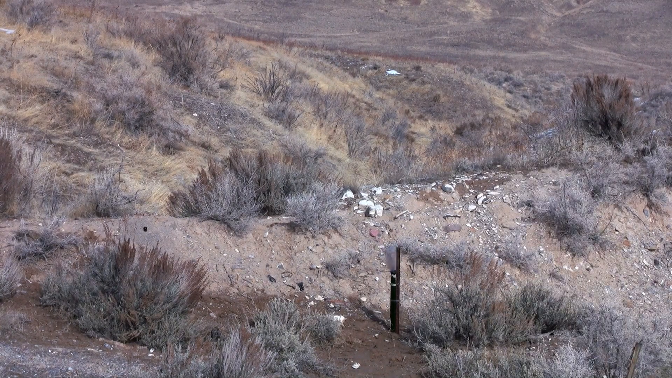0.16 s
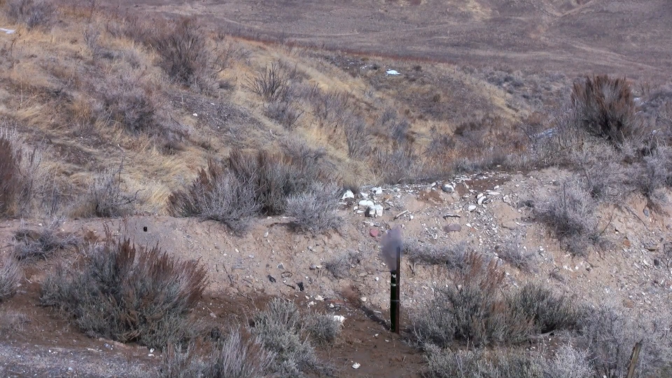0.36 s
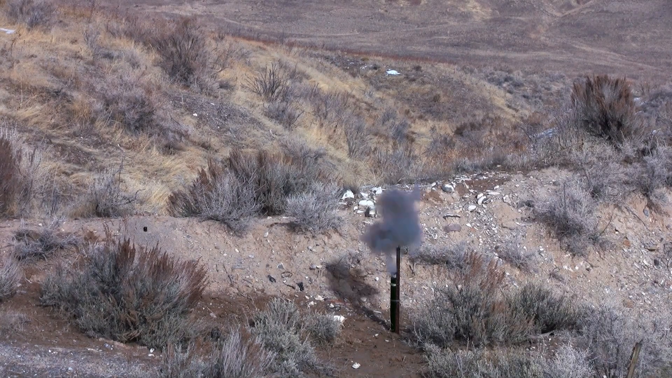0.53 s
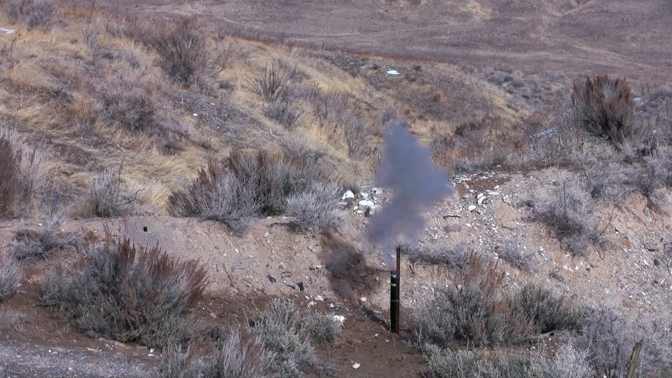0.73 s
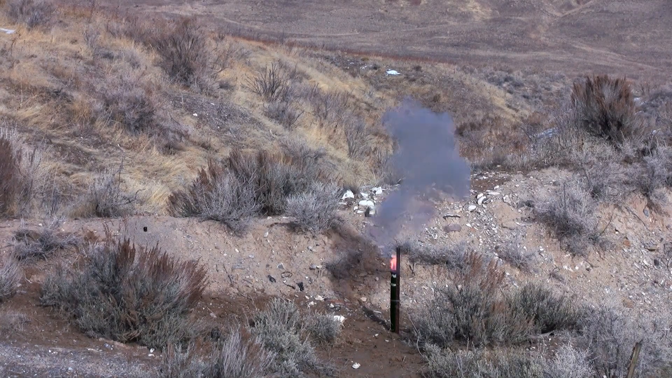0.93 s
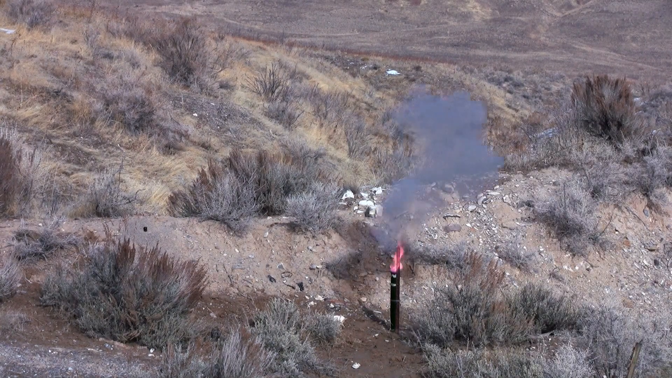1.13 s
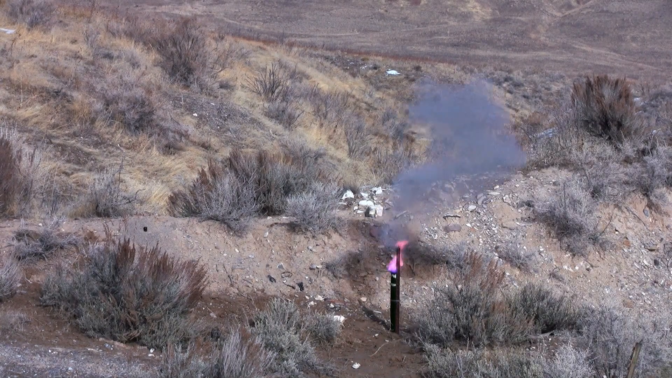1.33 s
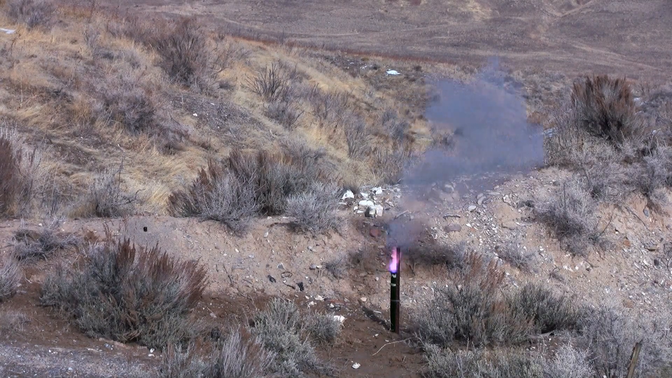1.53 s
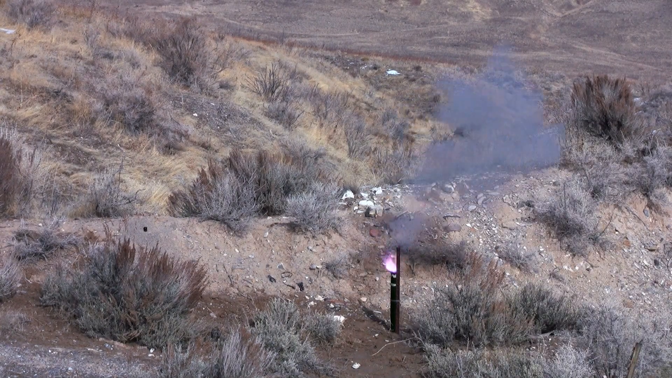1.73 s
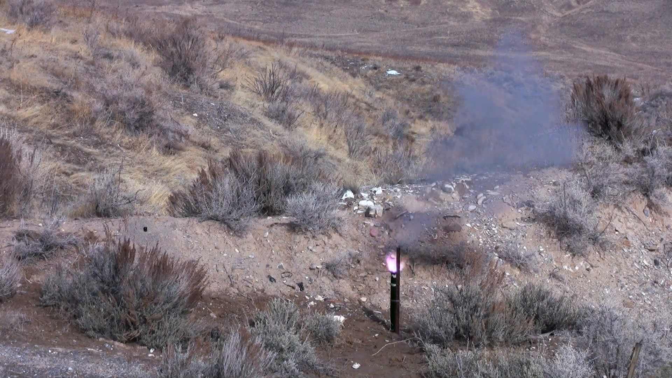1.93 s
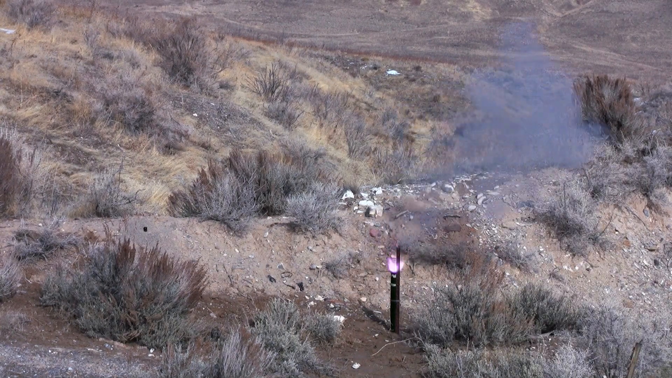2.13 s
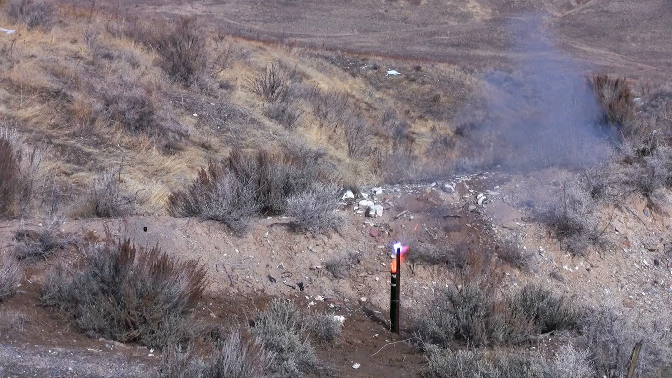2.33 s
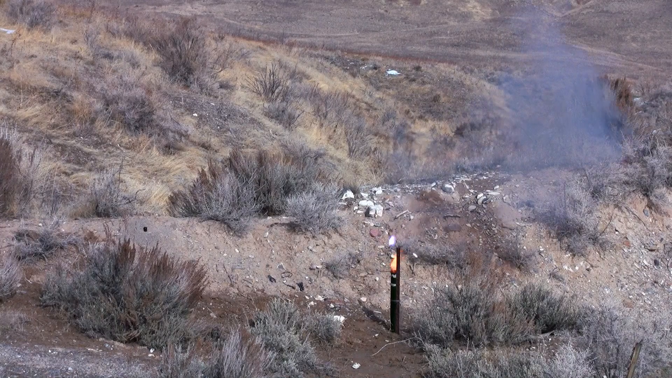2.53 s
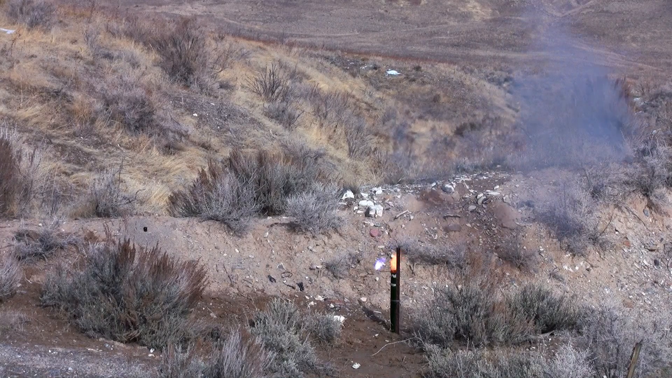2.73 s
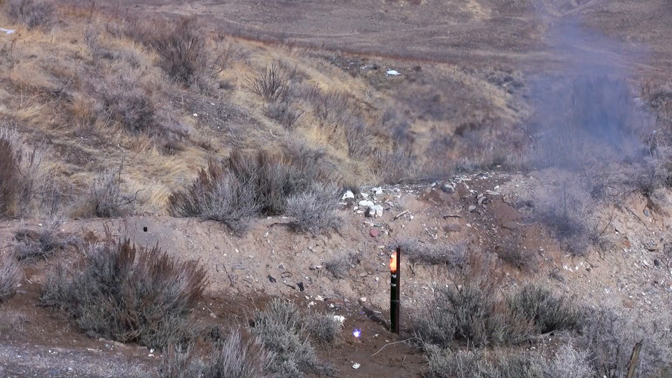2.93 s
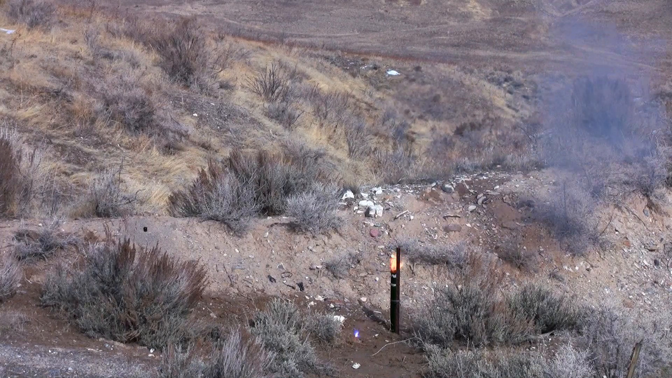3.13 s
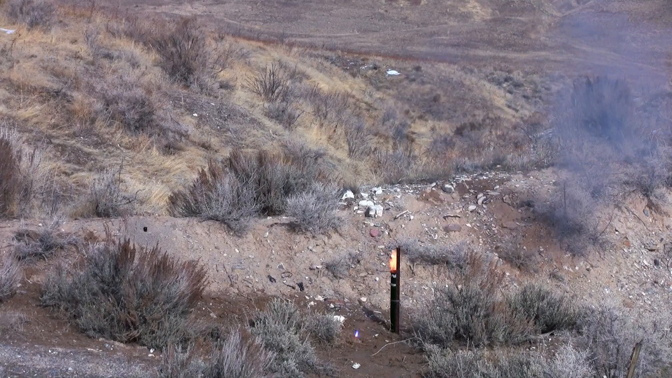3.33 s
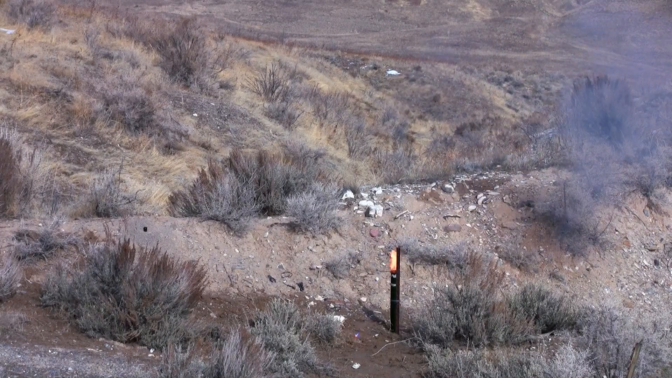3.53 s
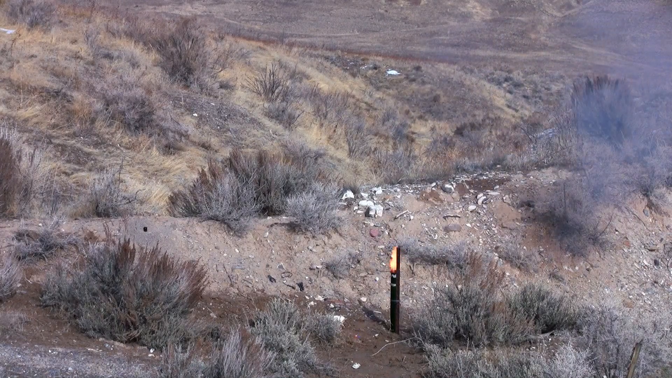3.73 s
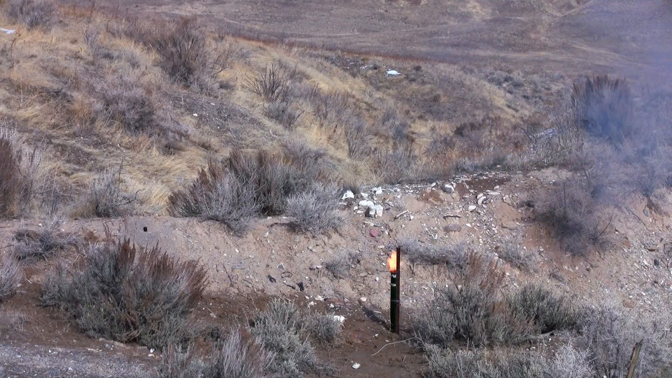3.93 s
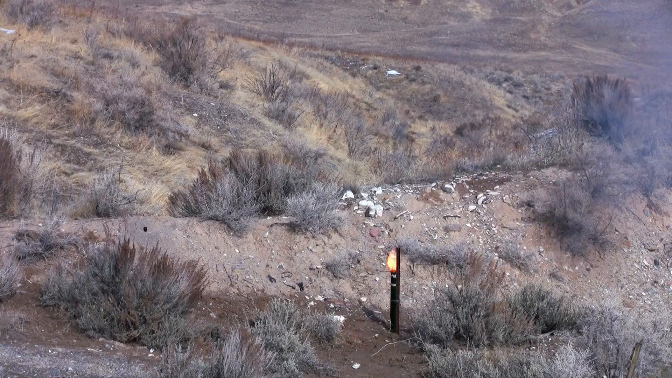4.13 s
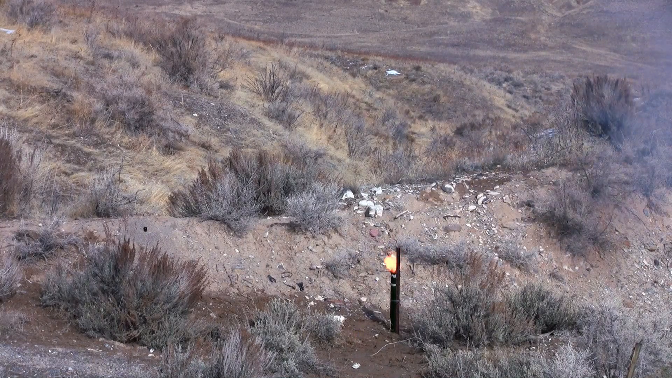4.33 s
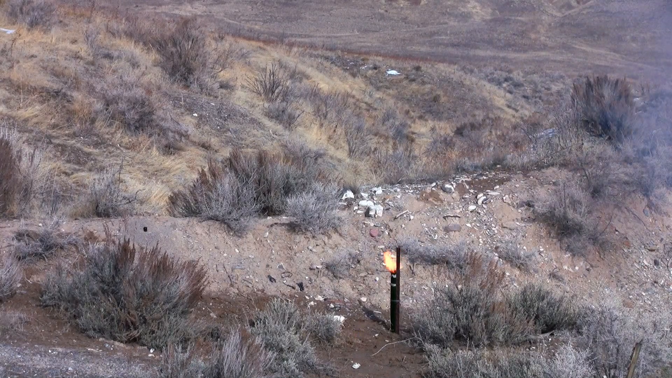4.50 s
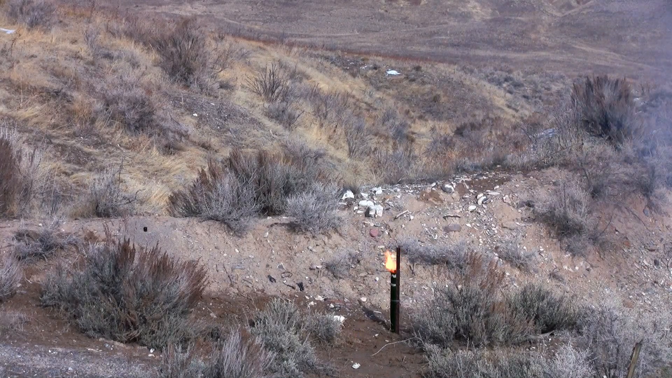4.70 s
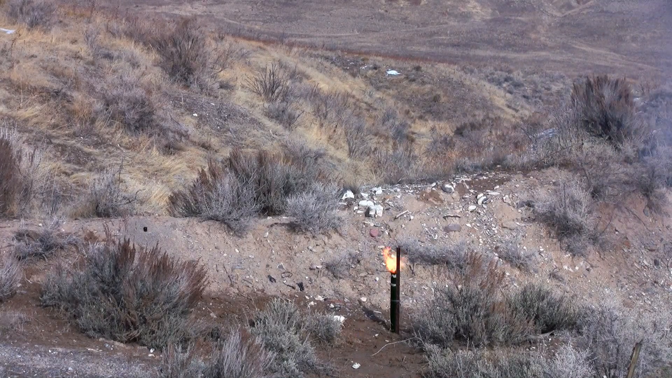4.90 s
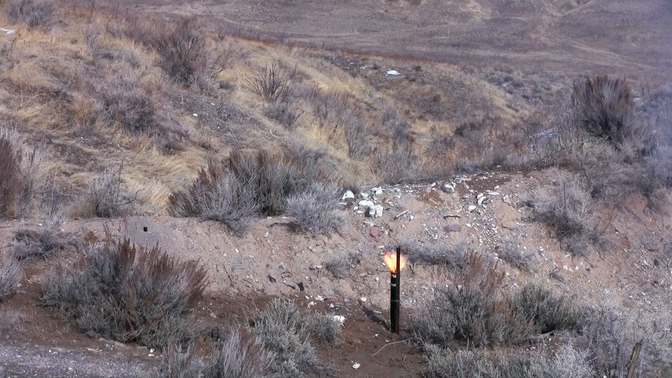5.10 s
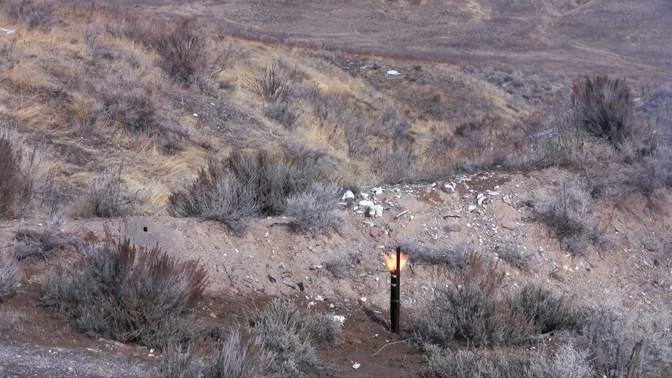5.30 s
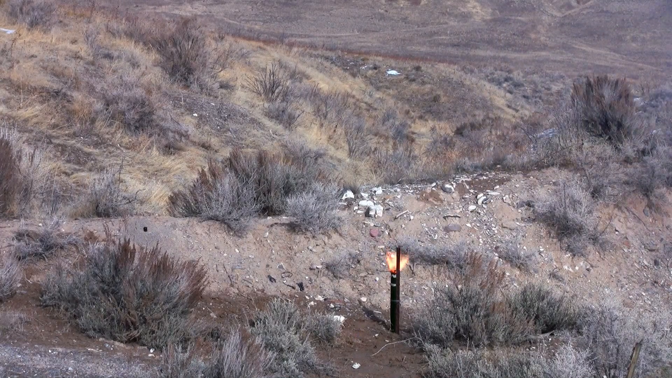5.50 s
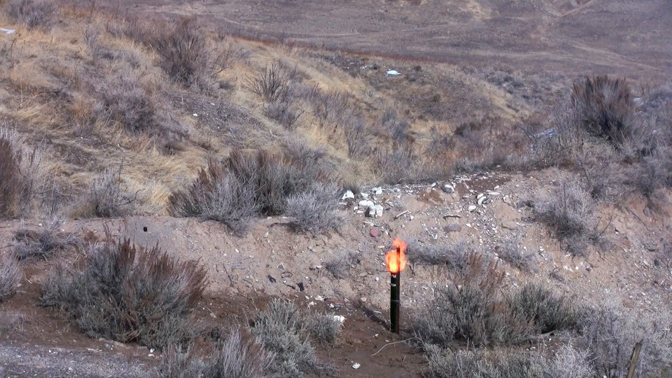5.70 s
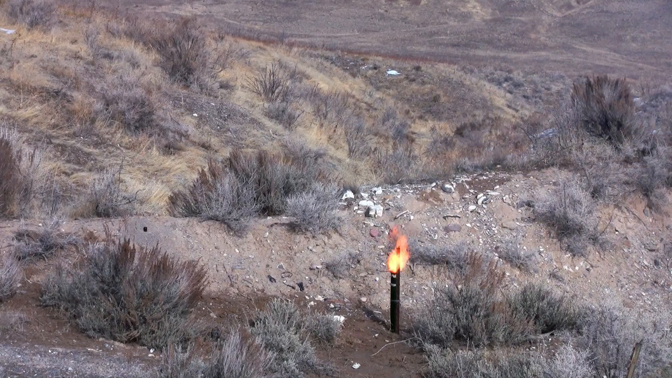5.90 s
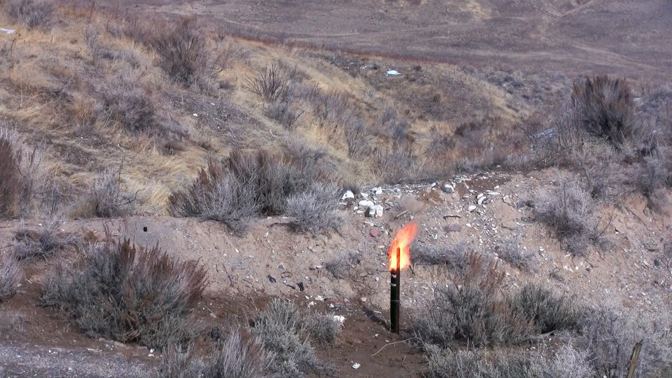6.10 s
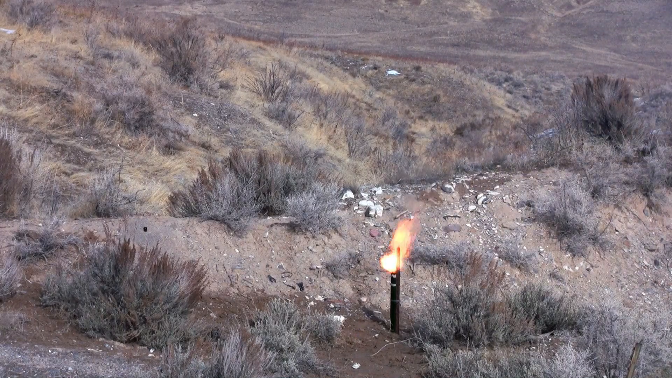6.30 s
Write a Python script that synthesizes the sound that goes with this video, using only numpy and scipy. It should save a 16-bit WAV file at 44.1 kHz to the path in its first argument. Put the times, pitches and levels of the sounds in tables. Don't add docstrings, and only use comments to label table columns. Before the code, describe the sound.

Heard from a few metres away outdoors, with light wind buffeting and faint microphone hiss: a clean gas jet swells under a second and explodes in a crisp double-edged bang, followed by short smeared echoes. A pause, then a rough, fluttering burn that cuts off with a smaller hollow crack. Tiny ember ticks over low burning, then a long rumbling swell turns into a bright, forceful hiss that keeps growing until the end.

```python
import sys
import numpy as np
from scipy import signal
from scipy.fft import rfft, irfft, next_fast_len
from scipy.io import wavfile
from scipy.ndimage import uniform_filter1d

SR = 44100
rng = np.random.default_rng(int(sys.argv[2]) if len(sys.argv) > 2 else 0)


def ratio_of_db(decibels):
    return 10 ** (np.asarray(decibels, float) / 20)


def unload_wav(signal):
    wavfile.write(
        sys.argv[1],
        SR,
        np.round(np.clip(np.atleast_2d(signal).T, -1, 1) * 32767).astype(np.int16),
    )


N = 280146
T = np.arange(N) / SR


def evened(x):
    return x / np.sqrt(np.mean(x ** 2) + 1e-20)


def read(points, hz):
    f, value = np.transpose(points)
    return np.interp(np.log(hz + 1), np.log(f + 1), value, left=-90, right=-90)


def colour(x, gain):
    size = next_fast_len(x.shape[-1])
    spectrum = rfft(x, size) * gain(np.fft.rfftfreq(size, 1 / SR))
    return irfft(spectrum, size)[..., :x.shape[-1]]


def wander(count, ms):
    size = max(round(ms * SR / 1000), 2)
    return evened(uniform_filter1d(uniform_filter1d(rng.standard_normal(count), size), size))


def bell(s, ms):
    return np.exp(-((T - s) * 1000 / ms) ** 2)


def burst(t, s, rise_ms, fall_ms):
    ms = (t - s) * 1000
    rise = np.exp(np.minimum(-ms / rise_ms, 50))
    fall = np.exp(np.minimum(ms / fall_ms, 50))
    return 2 / (rise + fall)


def turbulence(count, patchy_db, broad_db):
    a, b, fine, broad = rng.standard_normal((count // 64 + 5, 129, 4)).T
    fine = evened(uniform_filter1d(uniform_filter1d(fine, size=3, axis=0), size=24, axis=1))
    broad = evened(uniform_filter1d(uniform_filter1d(broad, size=8, axis=0), size=70, axis=1))
    cells = (a + 1j * b) * ratio_of_db(patchy_db * fine + broad_db * broad)
    return signal.istft(cells, nperseg=256, noverlap=192)[1][:count]


def puffs(rows, spectrum):
    out = np.zeros(N)
    for s, db, rise_ms, fall_ms, tilt_db in rows:
        near = slice(round((s - .03) * SR), round((s + .06) * SR))
        gas = rng.standard_normal(near.stop - near.start)
        gas = colour(gas, lambda hz: ratio_of_db(read(spectrum, hz) + tilt_db * np.log2(hz / 2000 + 0.012)))
        shape = burst(T[near], s, rise_ms, fall_ms)
        puff = shape * gas
        out[near] += ratio_of_db(db) * puff / np.sqrt(np.sum(puff ** 2) / np.sum(shape ** 2))
    return out


def rings(rows):
    return sum(ratio_of_db(db) * bell(s, ms) * np.cos(2 * np.pi * hz * (T - s)) for s, db, hz, ms in rows)


def bounced(hz, dip_hz, spacing_hz, strength, fade_hz):
    turn = 2j * np.pi * (hz - dip_hz) / spacing_hz
    return abs(1 - strength * np.exp(turn - hz / fade_hz))


# (frequency [Hz], density [dB per Hz])
VALLEY_HUSH = [(18, -32.5), (30, 0.5), (158, -7.5), (257, -3), (372, 2), (538, -1.5), (1560, -11.5),
               (1760, -10.5), (4000, -25), (5200, -44.5), (8800, -120)]
# (frequency [Hz], density [dB per Hz])
INPUT_HISS = [(1500, -10), (3500, 4.5), (6000, 3), (9000, -2.5), (12000, -6.5), (14000, -9.5), (15600, -12)]
# (time [s], gain [dB])
HISS_GAIN = [(0, 3), (.6, 5.5), (.66, 0), (1.1, -3.5), (1.6, 3), (2.4, 1), (3.2, -0.5), (4.5, 3),
             (6.35, 4.5)]


def air():
    hush = evened(colour(rng.standard_normal((2, N)), lambda hz: ratio_of_db(read(VALLEY_HUSH, hz))))
    hiss = evened(colour(rng.standard_normal((2, N)), lambda hz: ratio_of_db(read(INPUT_HISS, hz))))
    hush_db = -59 - 5.9 * bell(.88, ms=140)
    hiss_db = -76 + np.interp(T, *np.transpose(HISS_GAIN))
    return ratio_of_db(hush_db) * hush + ratio_of_db(hiss_db) * hiss


# (frequency [Hz], density [dB per Hz])
WIND_COLOUR = [(18, -39.5), (40, -7.5), (110, 3), (199, -0.5), (341, -8), (467, -16.5), (600, -17.5),
               (780, -41), (1320, -120)]
# (time [s], level [dB], rise [ms], fall [ms])
WIND_PUFFS = [(.04, -51, 56, 62), (.23, -48.5, 20, 22), (.28, -56, 12, 12), (.36, -45.5, 18, 30),
              (.41, -48, 7.7, 16), (.465, -38, 8.7, 18), (.57, -50, 27, 32), (.655, -44, 13, 9.2),
              (.73, -61, 30, 42), (0.789, -45, 4, 10), (.84, -53, 14, 27), (0.904, -56, 9.4, 24),
              (1.031, -56, 28, 13), (1.22, -64.5, 20, 62), (1.36, -64.5, 18, 33), (1.5, -59.5, 33, 49),
              (1.6, -57, 33, 58), (1.8, -64, 58, 36), (6.2, -55, 8, 19), (6.28, -50, 9, 19)]


def wind():
    lumps = rng.standard_normal((2, N)) * ratio_of_db(2.8 * wander(N, 3.2))
    gust = colour(lumps + 0.55 * lumps[::-1], lambda hz: ratio_of_db(read(WIND_COLOUR, hz)))
    swell = sum(ratio_of_db(db) * burst(T, s, rise_ms, fall_ms) for s, db, rise_ms, fall_ms in WIND_PUFFS)
    return evened(gust) * swell


# (start [s], level [dB], t60 [s], top [Hz], left-right likeness [0-1])
TAILS = [
    (.004, -24.5, 0.14, 10850, .9),
    (0.048, -51, .6, 3535, .3),
]
# (delay [s], smear [ms], level [dB], centre [Hz], width [octaves])
SLOPE_ECHOES = [
    (.095, 28, -37.5, 3296, 4.6),
    (.16, 33, -43, 4500, 1.4),
    (.29, 75, -52, 4500, 0.89),
    (.345, 22, -47.5, 1700, 1.3),
    (.41, 45, -53.5, 2242, .6),
]


def hillside(x):
    t = T[:SR // 2 + SR // 10]
    taps = np.zeros((2, len(t)))
    for s, db, t60, top_hz, same in TAILS:
        left, other = rng.standard_normal(taps.shape)
        right = same * left + np.sqrt(1 - same ** 2) * other
        tail = np.array([left, right]) * (t > s) * ratio_of_db(-60 * t / t60)
        tail = colour(tail, lambda hz: hz / (hz + 400) / (1 + (hz / top_hz) ** 2))
        taps += ratio_of_db(db) * tail / np.linalg.norm(tail[0])
    for s, ms, db, hz0, octaves in SLOPE_ECHOES:
        echo = rng.standard_normal(taps.shape) * bell(s, ms)[:len(t)]
        echo = echo + .3 * echo[::-1]
        echo = colour(echo, lambda hz: np.exp(-(np.log2(hz / hz0 + .01) / octaves) ** 2))
        taps += ratio_of_db(db) * echo / np.linalg.norm(echo[0])
    return signal.fftconvolve(x[None], taps, axes=1)[:, :N]


# (centre [Hz], width [Hz], gain [dB])
BODY_MODES = [
    (5500, 340, 1),
    (7600, 320, 4.5),
    (8100, 220, -3.5),
    (9200, 150, 1),
    (6260, 200, 1),
]


def camera_body(x):
    lift_db = lambda hz: sum(db / (1 + ((hz - hz0) / width) ** 2) for hz0, width, db in BODY_MODES)
    return colour(x, lambda hz: ratio_of_db(lift_db(hz)))


# (frequency [Hz], level [dB])
PORT_SHADE = [(5500, -47), (7600, -26.5), (8800, -15.5), (10300, -10), (11800, -8.5), (13000, -23.5)]


def ports(direct):
    turn = lambda hz: 1.2 * np.tanh((hz - 10600) / 250)
    shade = colour(direct, lambda hz: ratio_of_db(read(PORT_SHADE, hz)) * np.exp(-1j * turn(hz)))
    return np.array([direct - shade, direct + shade])


# (time [s], level [dB], length [ms], tilt [dB per octave])
EMBER_SPITS = [(2.6722, -53.5, 2.6, 2), (2.71, -52.5, 5, -2.5), (2.768, -55, 1.8, -1.5),
               (2.797, -53, 1.7, -1.5), (2.828, -62, 1.6, 1), (2.980, -50.5, 1.18, -2),
               (2.987, -52.5, 2.5, -2), (3.040, -54, .9, -0.7), (3.076, -45.5, 2.4, -4.5),
               (3.608, -58, 1.22, -9), (4.577, -48, 1.1, -9), (2.921, -56.5, 1.3, -2.5)]
# (frequency [Hz], density [dB per Hz])
SPIT_COLOUR = [(150, 18), (4000, 1.5), (9500, -13.5), (12000, -18.5), (15500, -50.5)]
# (time [s], level [dB], frequency [Hz], half length [ms])
EMBER_KNOCKS = [
    (3.079, -47, 620, 2.2),
    (2.99, -48, 300, 3.5),
    (2.796, -50, 600, 2),
]


def embers():
    rows = [(s + .001, db, .4 * ms, ms, tilt_db) for s, db, ms, tilt_db in EMBER_SPITS]
    return puffs(rows, SPIT_COLOUR) + rings(EMBER_KNOCKS)


def whistle():
    centre_hz, half_width_hz = 1650, 70
    ridge = lambda hz: 1 / (1 + ((hz - centre_hz) / half_width_hz) ** 2)
    return ratio_of_db(-54.5) * bell(1.34, ms=150) * evened(colour(rng.standard_normal(N), ridge))


# (time [s], level [dB], centre [Hz], half length [ms])
GAS_TONGUES = [(.33, -61, 7200, 55), (.59, -46.5, 11700, 12), (0.59, -35, 3500, 8), (1.48, -43, 2210, 7.3),
               (1.73, -39.5, 2140, 46), (1.56, -61, 3700, 45), (1.64, -46.5, 4470, 42),
               (1.65, -59.5, 7450, 30), (1.92, -40, 2720, 64), (1.93, -53, 7640, 21), (2.03, -50, 4930, 22),
               (2.05, -46, 2020, 25), (2.14, -53, 4860, 51), (2.15, -53.5, 7000, 14),
               (2.189, -35, 1036, 6.2), (4.5, -86, 7670, 130), (4.85, -82, 5900, 150), (5.2, -47, 3600, 53),
               (5.88, -40.5, 4480, 64), (5.984, -37.5, 3000, 5.6), (6.011, -35, 3550, 15),
               (6.03, -40.5, 4950, 44), (6.225, -40, 2500, 13), (6.09, -46, 7600, 16),
               (6.12, -32.5, 3000, 14), (6.145, -41, 9200, 38), (6.165, -29.5, 2170, 4.7),
               (6.3, -33.5, 2150, 43), (6.325, -28, 2780, 11), (6.3, -35, 9200, 59),
               (6.31, -28.5, 3460, 62)]


def flares():
    out = np.zeros(N)
    for s, db, hz0, ms in GAS_TONGUES:
        octaves = .1 + 1500 / hz0 * .9
        band = lambda hz: np.exp(-(np.log2(hz / hz0 + .01) / octaves) ** 2)
        gas = evened(colour(rng.standard_normal(8192), band))
        out += ratio_of_db(db) * bell(s, ms) * np.resize(gas, N)
    return colour(out, lambda hz: bounced(hz, dip_hz=2550, spacing_hz=1830, strength=.65, fade_hz=16000))


# (time [s], level [dB], frequency [Hz], half length [ms])
TUBE_POPS = [
    (2.3548, -27, 235, 5.5),
    (.638, -37, 260, 10),
    (4.6155, -35, 190, 4),
    (5.735, -26, 230, 6),
]


def tube_pops():
    return rings(TUBE_POPS)


# (time [s], peak level [dB], rise [ms], fall [ms], tilt [dB per octave])
GAS_BLASTS = [
    (.6258, -6, 1.54, 2.1, 3.5),
    (.6305, -7.5, 0.96, 1.75, -2),
    (.6400, -6, 1, 1.14, 3.5),
    (.6443, -10.5, 1.8, 2.1, 7.5),
    (.620, -20, 4.6, 4.3, 4.5),
    (2.346, -37, 4, 6, 4),
    (2.348, -25.5, 2, 3.4, -9.5),
    (2.358, -52, 3.2, 21.3, 6),
]
# (frequency [Hz], density [dB per Hz])
BLAST_COLOUR = [(59, -62), (100, -28.5), (233, -17), (429, -13), (742, -12), (956, -5.5), (1430, 0),
                (1620, 0.5), (2420, -6.5), (4020, -13.5), (5510, -23), (6390, -25.5), (7410, -24),
                (9340, -27), (15500, -56.5)]


def blasts():
    return colour(puffs(GAS_BLASTS, BLAST_COLOUR), lambda hz: 1 / (1 + (hz / 12310) ** 8))


# (frequency [Hz], density [dB per Hz])
ROAR_COLOUR = [(250, -12), (450, -3), (700, -3), (1000, -9), (1400, -13.5), (2500, -49.5)]
# (frequency [Hz], density [dB per Hz])
TUBE_RUMBLE = [(41, -49), (70, -16), (119, -7), (236, 1), (339, -5.5), (381, -7.5), (490, -21.5),
               (520, -18), (680, -40), (1140, -120)]


def surge(rows, jet, bounce, mix, flutter_db):
    s, *levels = np.transpose(rows)
    near = slice(max(round((s[0] - .01) * SR), 0), min(round((s[-1] + .01) * SR), N))
    t = T[near]
    hiss_db, flame_db = (np.interp(t, s, v) for v in levels)
    sizzle_mid_db, per_jet, per_flame, roar_share_db, rumble_share_db = mix
    middle_db = -40
    sizzle_db = sizzle_mid_db + per_jet * (hiss_db - middle_db) + per_flame * (flame_db - middle_db)
    roar_db = roar_share_db + flame_db + 0.17 * (hiss_db - flame_db)
    rumble_db = flame_db + rumble_share_db

    heard = lambda hz: ratio_of_db(read(jet, hz)) * bounced(hz, *bounce)
    low = lambda hz: 1 / np.sqrt(1 + (hz / 3310) ** 6)
    high = lambda hz: np.sqrt(1 - low(hz) ** 2)
    slow, fast = wander(len(t), 9), wander(len(t), 1.5)
    gas = turbulence(len(t), patchy_db=1.6, broad_db=1.5)
    hiss = gas * ratio_of_db(0.303 * flutter_db * slow + 0.27 * fast)
    hiss = evened(colour(hiss, lambda hz: heard(hz) * low(hz)))
    sizzle = gas * ratio_of_db(flutter_db * slow + 0.68 * fast)
    sizzle = evened(colour(sizzle, lambda hz: heard(hz) * high(hz)))
    roar = gas * ratio_of_db(0.27 * slow + .9 * fast)
    roar = evened(colour(roar, lambda hz: ratio_of_db(read(ROAR_COLOUR, hz))))
    rumble = rng.standard_normal(len(t)) * ratio_of_db(1.5 * slow)
    rumble = evened(colour(rumble, lambda hz: ratio_of_db(read(TUBE_RUMBLE, hz))))

    lit = 1. * (t >= s[0]) * (t <= s[-1])
    burning = np.sqrt(np.abs(uniform_filter1d(lit, size=300)))
    fire = ratio_of_db(hiss_db) * hiss + ratio_of_db(sizzle_db) * sizzle + ratio_of_db(roar_db) * roar + ratio_of_db(rumble_db) * rumble
    out = np.zeros(N)
    out[near] = burning * fire
    return out


# (time [s], jet strength [dB], flame size [dB])
CLEAN_JET = [(0, -66, -59.5), (.14, -52, -56), (.22, -46.5, -58.5), (.34, -37, -61.5), (.45, -32, -62),
             (.53, -29, -55.5), (.594, -23.5, -52.5), (.606, -29.5, -59), (.612, -28, -60.5)]
FLAME_LIGHTS = [(1.08, -71.5, -79), (1.31, -56, -75), (1.396, -49.5, -79), (1.42, -52, -48),
                (1.45, -45, -73), (1.472, -53, -35.5), (1.69, -46.5, -36)]
RAGGED_BURN = [(1.69, -50, -52), (1.722, -45, -42.5), (1.79, -42.5, -43.5), (1.864, -37.5, -36.5),
               (2.117, -39, -45), (2.148, -37.5, -40.5), (2.176, -41.5, -46), (2.32, -41, -36),
               (2.346, -31, -41.5)]
LONG_SWELL = [(4.15, -59.5, -51), (4.688, -48.5, -42.5), (4.76, -48.5, -38.5), (4.79, -48.5, -42),
              (5.04, -44.5, -41.5), (5.102, -41, -33), (5.134, -43, -38), (5.642, -36, -29),
              (5.751, -37.5, -30)]
JET_RETURNS = [(5.75, -34, -39), (5.78, -37.5, -49.5), (5.902, -36.5, -43), (6.01, -30.5, -46.5),
               (6.042, -32, -39), (6.121, -30, -52), (6.204, -31, -38), (6.316, -26.5, -40),
               (6.353, -25, -45.5)]
LOW_BURN = [(2.43, -74, -65.5), (2.506, -71.5, -64.5), (3.3, -71, -64), (3.388, -68, -61),
            (4.15, -59.5, -56)]
# (frequency [Hz], density [dB per Hz])
JET_COLOURS = [
    [(530, -36), (1100, -2), (2000, -2), (3900, -9), (5000, -20.5), (9400, -19), (10200, -33.5),
     (15500, -56)],
    [(530, -51.5), (900, 3), (1700, 1.5), (3700, -1.5), (4600, -11), (7400, -19), (15500, -62)],
    [(530, -20), (900, -3), (2000, -1), (3600, -8), (5400, -16), (6300, -20), (9300, -20), (15500, -59)],
    [(530, -38), (900, 5.5), (1400, -3.5), (3800, -9.5), (5000, -14), (9400, -20.5), (15500, -55)],
    [(530, -25.5), (1050, -5), (1800, -3.5), (3800, -7.5), (5000, -7.5), (9400, -9.5), (11000, -20),
     (14800, -33.5), (15500, -35)],
    [(530, -60), (900, -6), (1340, 13.5), (2200, 7.5), (3700, 4.5), (4800, -4), (9000, -24), (11700, -68)],
]
# (one dip [Hz], spacing [Hz], strength [0-1], rough ground loses it over [Hz])
GROUND_BOUNCES = [
    (2680, 1830, 0.3, 25000),
    (2618, 1790, 0.39, 20000),
    (2570, 1700, 0.18, 6700),
    (2996, 2016, 0.85, 4400),
    (2770, 1780, .36, 11000),
    (3000, 1580, 0.3, 15000),
]
# (sizzle at middle strength [dB], its rise with jet [dB/dB], with flame [dB/dB],
# roar above flame size [dB], rumble above flame size [dB])
STAGE_MIXES = [
    (-57, 1.615, .05, 1, -0.5),
    (-37, 1.36, 0.94, -21, -19),
    (-49, 0.83, 0.086, -2, 2),
    (-48.5, 1.82, 0.044, -8, -2.4),
    (-53.5, 1.5, 0.17, -9, 2),
    (-62, 1.21, 0.055, 0.3, 2),
]
EDGE_FLUTTER = [1.1, 1.3, 2.2, 2.4, 1.5, 1.5]
# (time [s], depth [dB], half width [ms])
BRIEF_DIPS = [(.605, 6, 6), (1.69, 9, 4), (1.785, 7, 5), (2.005, 4, 16), (6.0, 4, 4), (6.19, 2.5, 12),
              (5.96, 2, 10), (2.1, 2.5, 10), (2.21, 2.5, 12), (2.331, 5, 6), (6.065, 2, 20), (1.84, 2, 20),
              (6.052, 3, 3), (6.08, 2.5, 8)]


def surges():
    stages = [CLEAN_JET, FLAME_LIGHTS, RAGGED_BURN, LONG_SWELL, JET_RETURNS, LOW_BURN]
    fire = sum(map(surge, stages, JET_COLOURS, GROUND_BOUNCES, STAGE_MIXES, EDGE_FLUTTER))
    return fire * ratio_of_db(-sum(db * bell(s, ms) for s, db, ms in BRIEF_DIPS))


def motor():
    return surges() + whistle() + flares() + blasts() + tube_pops() + embers()


def scene():
    direct = camera_body(motor())
    return ports(direct) + hillside(direct) + wind() + air()


# (level [dB], ceiling [Hz])
TREBLE_CEILING = [
    (-48, 15900),
    (-41, 15000),
    (-33, 14200),
    (-28, 14800),
    (-20, 15000),
    (-14, 15900),
]


def capped(x):
    step_hz, limit_hz = 350, 15700
    hz, s, z = signal.stft(x, SR, nperseg=1024)
    power = np.interp(s, T, uniform_filter1d(x[0] ** 2, size=2500))
    top = np.interp(10 * np.log10(abs(power) + 1e-12), *np.transpose(TREBLE_CEILING))
    jumps = np.round(np.repeat(rng.standard_normal(len(s)), 2)[:len(s)])
    top = np.minimum(top + step_hz * jumps, limit_hz)
    top = np.where(power < ratio_of_db(2 * TREBLE_CEILING[0][0]), limit_hz, top)
    return signal.istft(z * (hz[:, None] < top), SR, nperseg=1024)[1][:, :N]


def top_cut(x):
    return signal.sosfilt(signal.butter(12, 15720, fs=SR, output="sos"), x)


def record(dry):
    dry = colour(dry, lambda hz: hz ** 2 / (hz ** 2 + 40 ** 2))
    limited = 1.2 * np.tanh(dry / 1.2)
    lost_db = 24 * burst(T, 4.5135 - .001, rise_ms=1, fall_ms=8.5) / 1.3
    kept = limited * ratio_of_db(-lost_db)
    return top_cut(capped(kept))


dry = scene()
out = record(dry)
unload_wav(out)
```